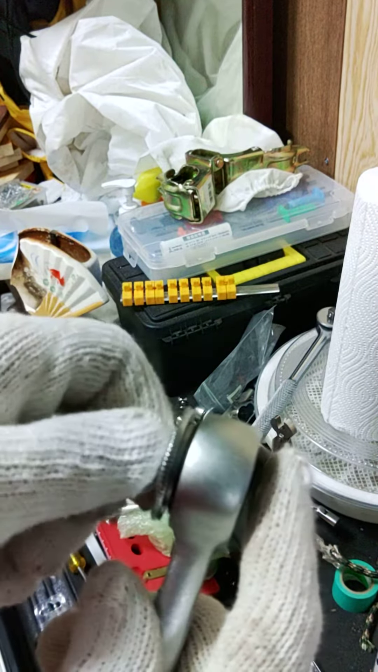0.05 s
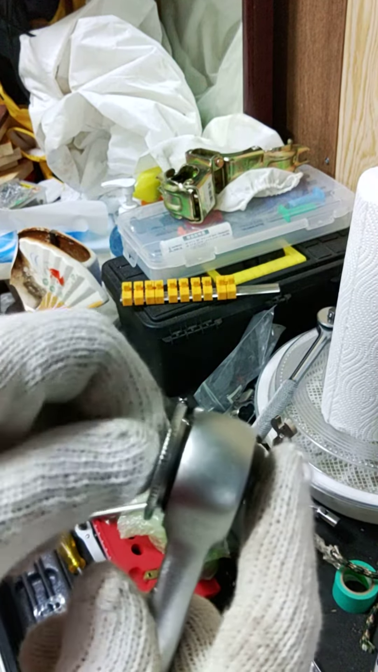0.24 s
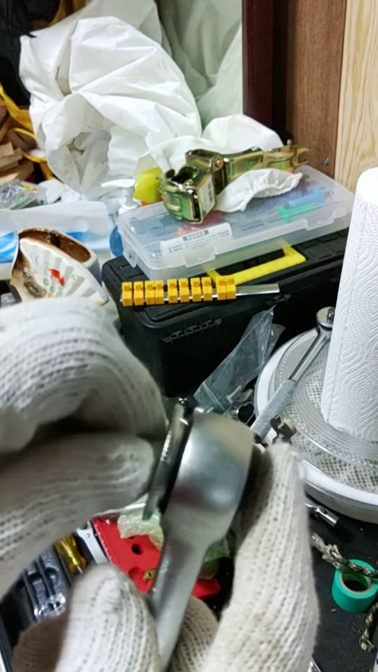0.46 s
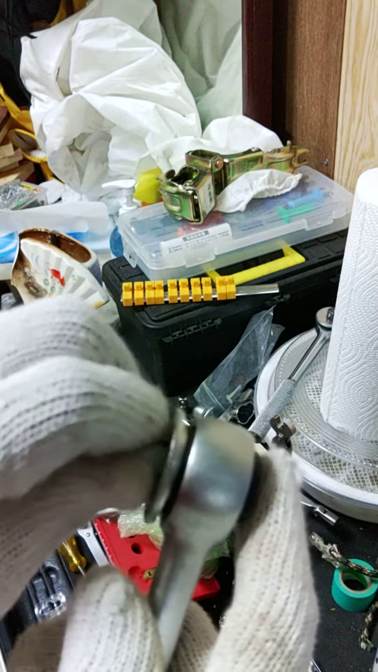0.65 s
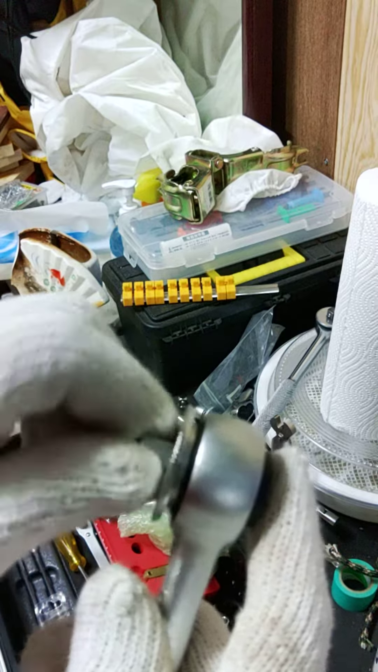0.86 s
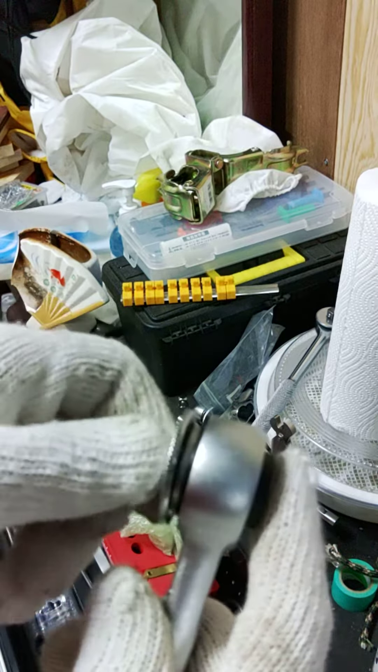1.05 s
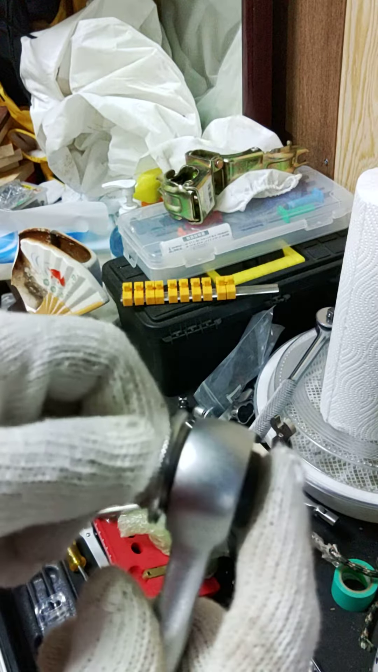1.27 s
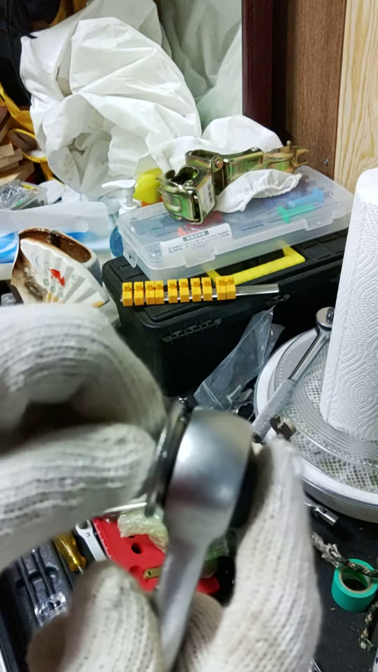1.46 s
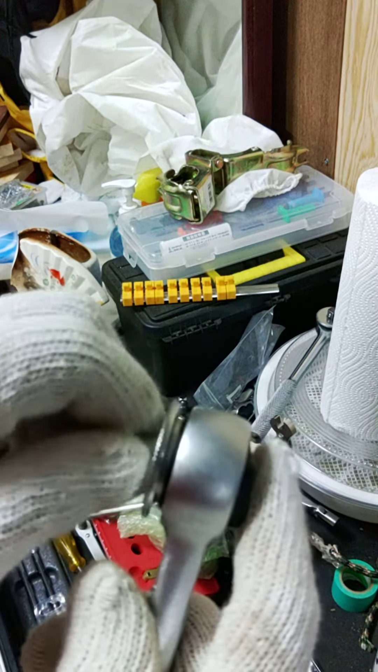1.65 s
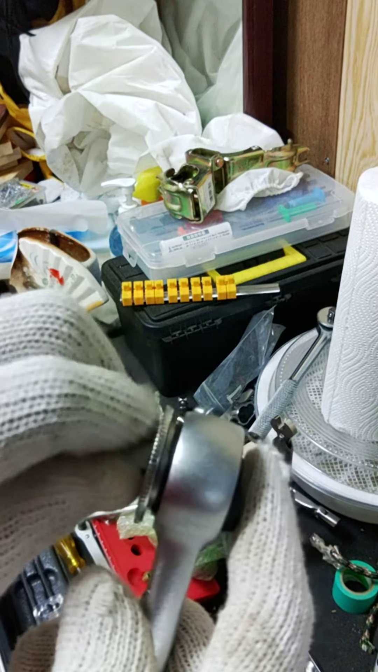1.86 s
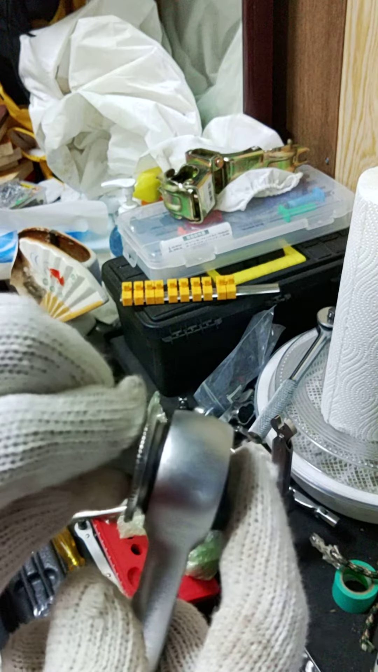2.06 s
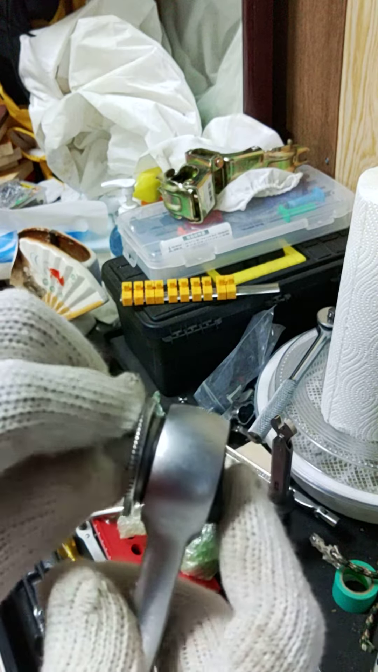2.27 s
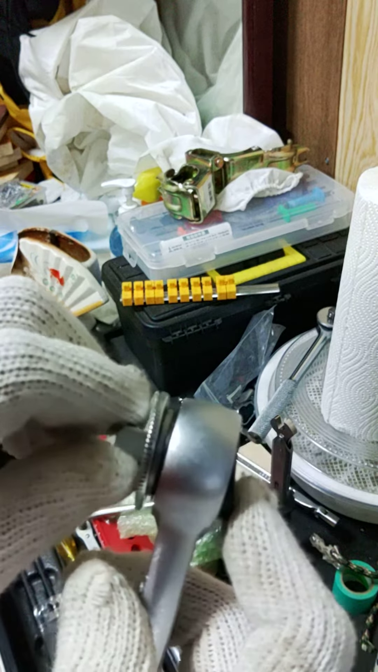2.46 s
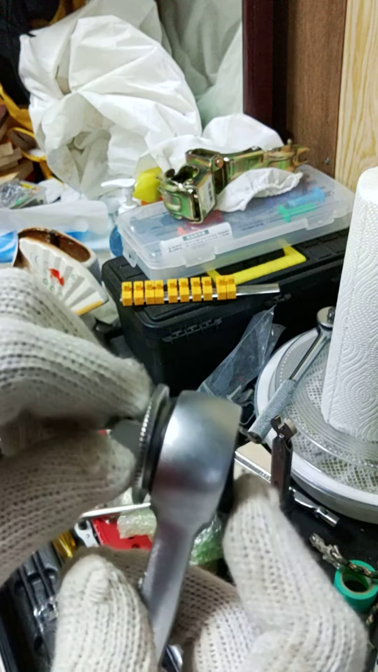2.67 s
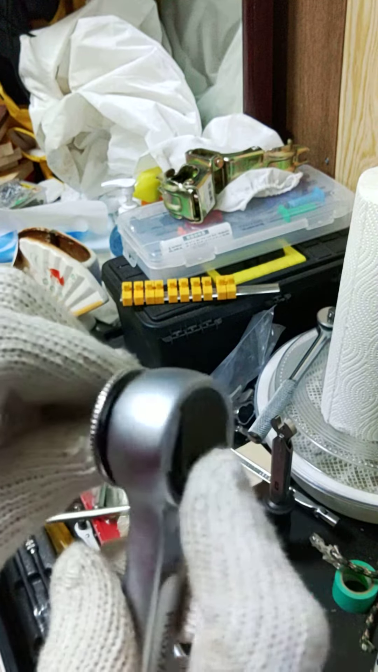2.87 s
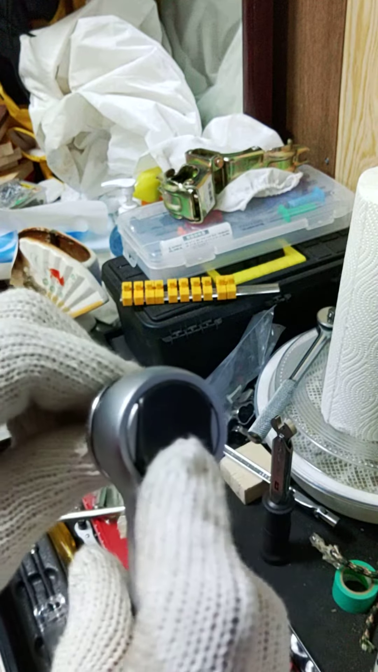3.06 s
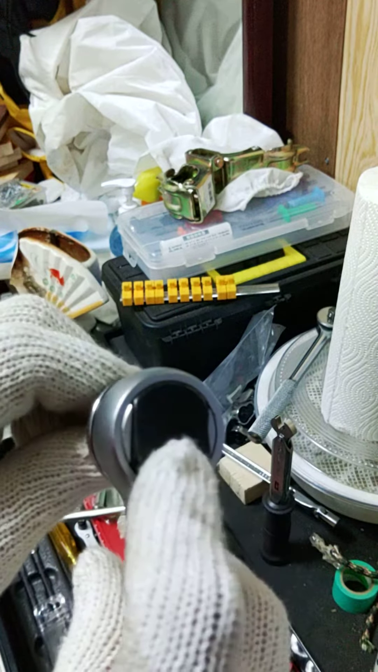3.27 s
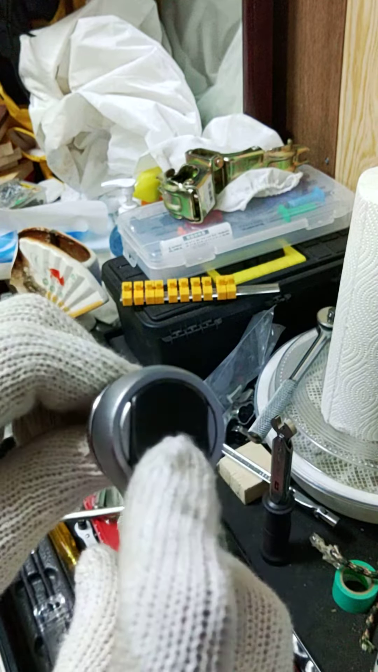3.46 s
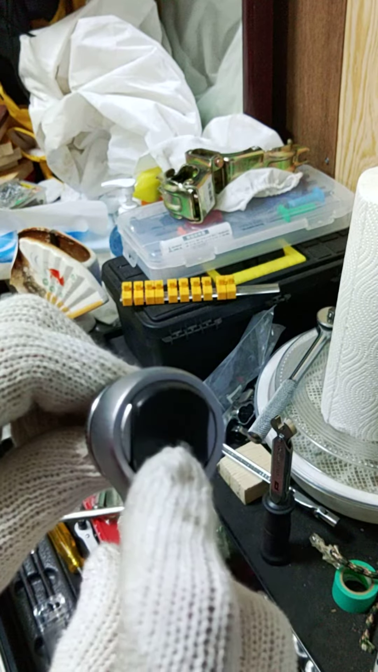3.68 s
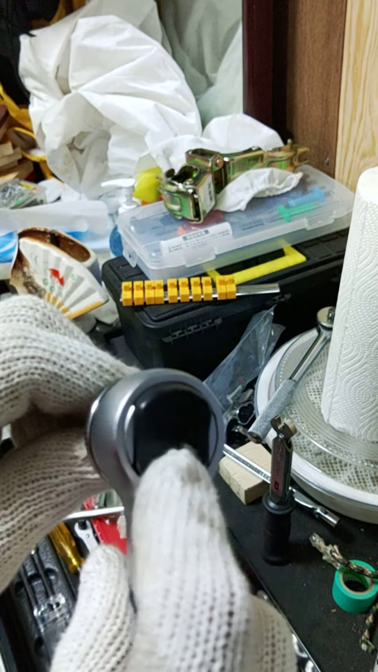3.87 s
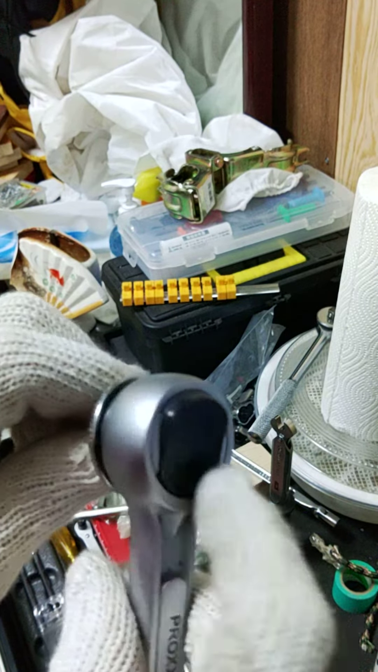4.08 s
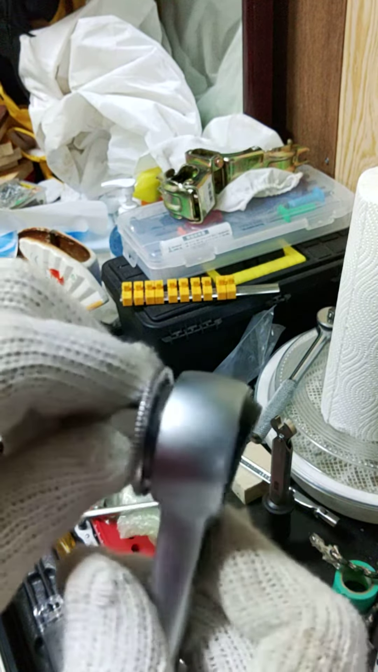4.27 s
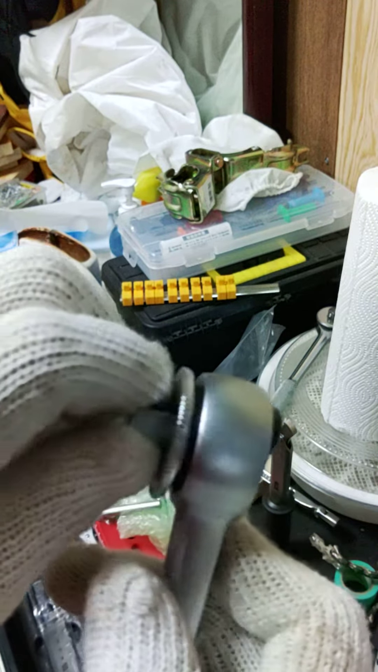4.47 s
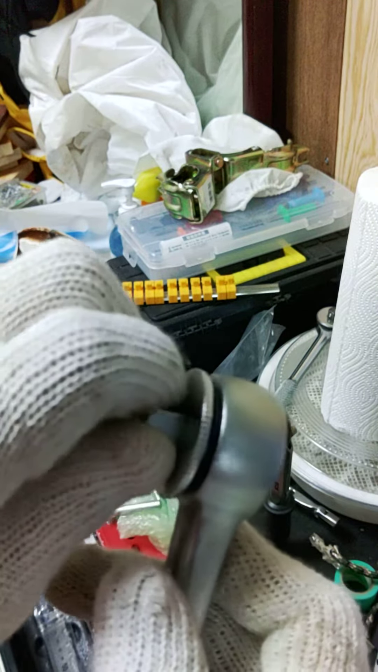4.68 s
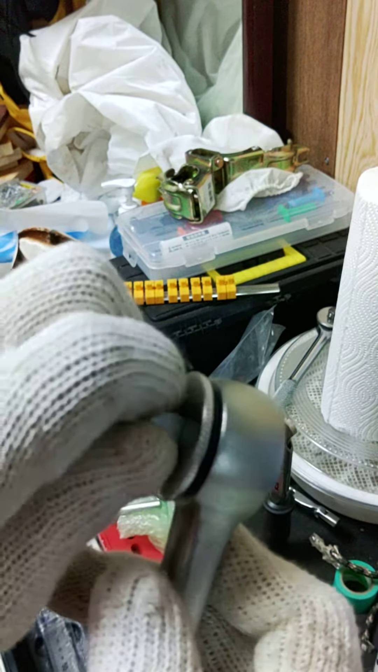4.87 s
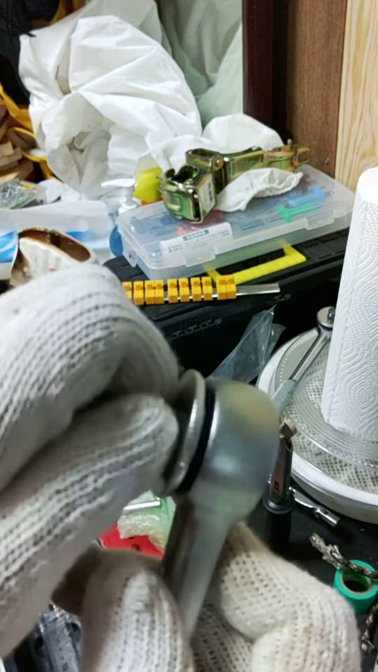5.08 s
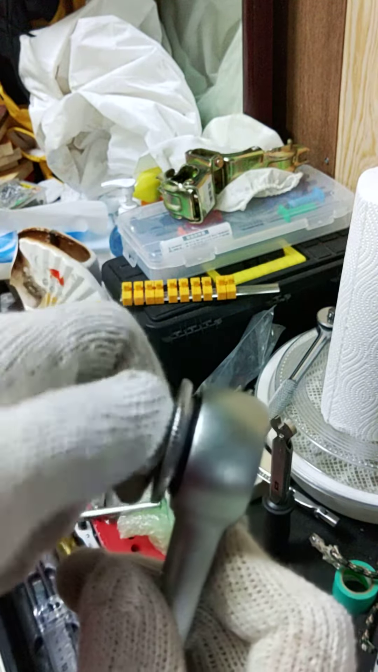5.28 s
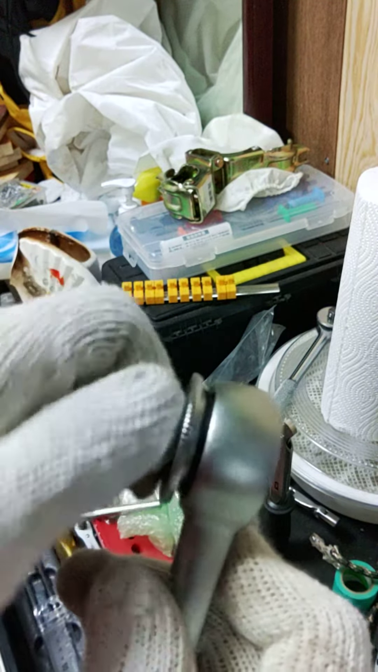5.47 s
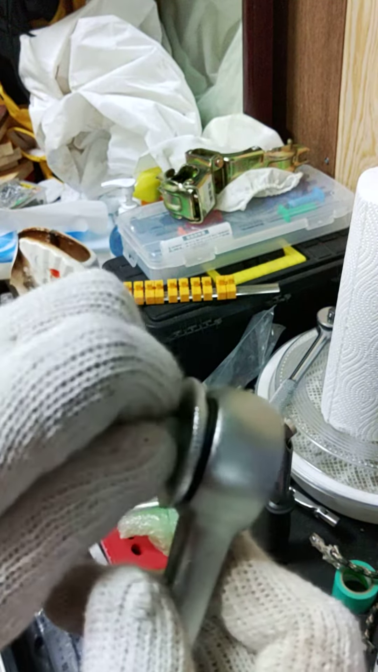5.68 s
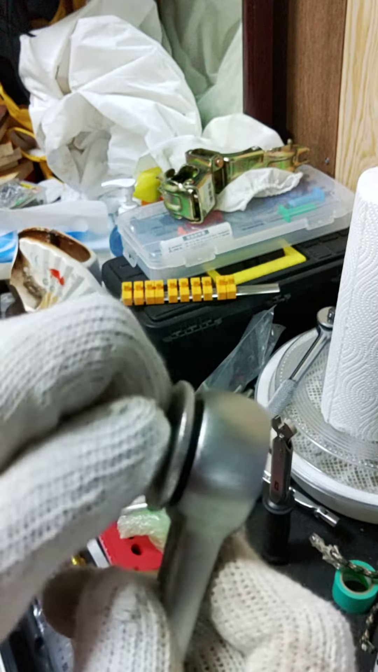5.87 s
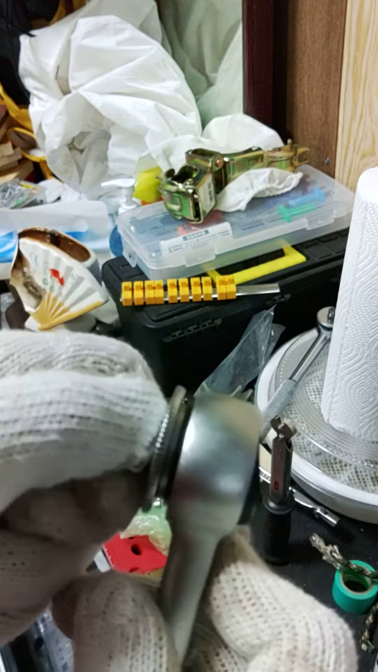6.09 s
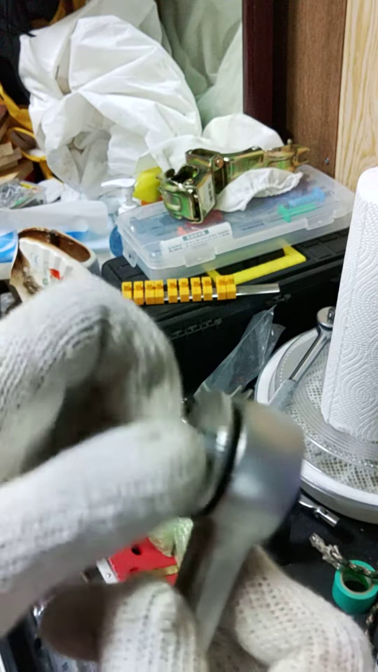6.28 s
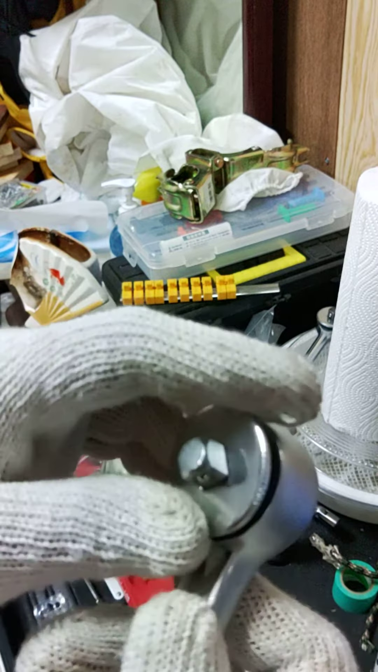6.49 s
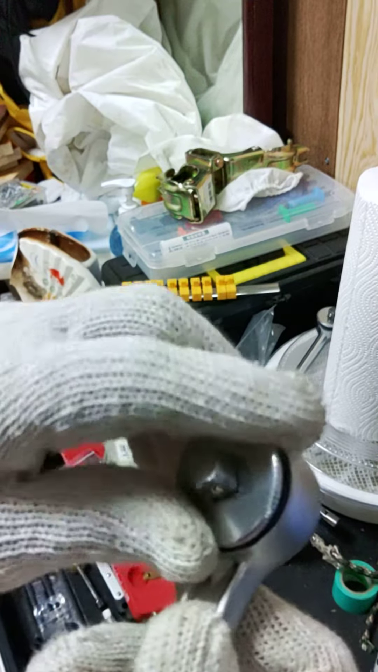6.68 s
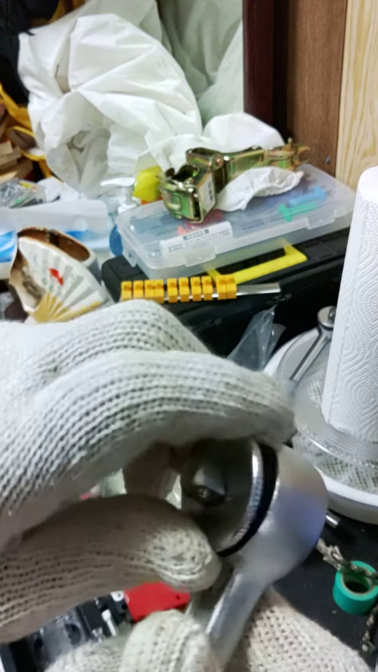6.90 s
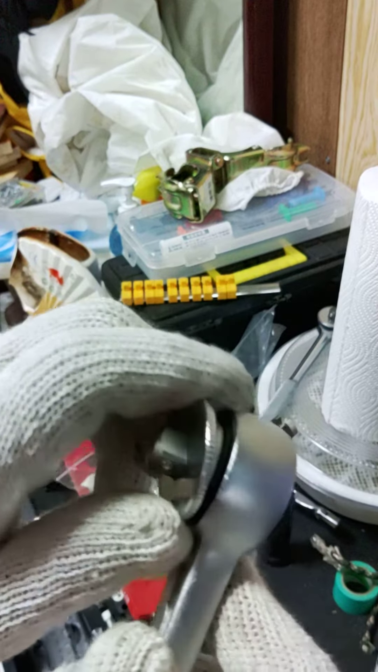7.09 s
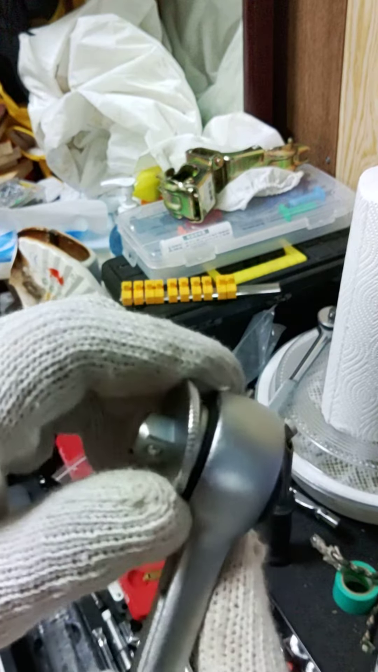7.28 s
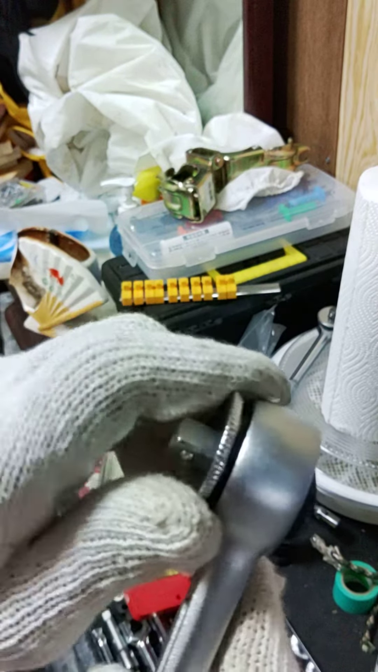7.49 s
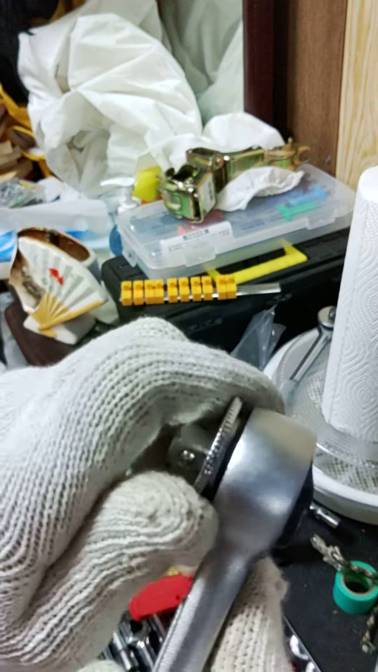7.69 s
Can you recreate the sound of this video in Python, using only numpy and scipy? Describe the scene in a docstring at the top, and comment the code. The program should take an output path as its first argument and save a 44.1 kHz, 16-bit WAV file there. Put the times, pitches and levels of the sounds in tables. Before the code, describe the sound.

A steel ratchet wrench clicks close by in four quick runs, with a ringing lever snap and faint glove rubbing over low rumble.

```python
"""Over a low rumble and faint hiss, a steel ratchet wrench clicks close to a phone in a small workshop.
Its pawl drops off tooth after tooth in four runs, then a few stray clicks. Gloves rub and bump the steel;
between runs the reversing lever snaps over and the loose drive clinks, setting the wrench ringing.
Bench and walls answer each click. Far outside a car swells and passes, and late on the turning hands
stir the air at the phone."""
import sys
import numpy as np
from scipy import signal
from scipy.fft import rfft, irfft
from scipy.io import wavfile
from scipy.ndimage import uniform_filter1d

SR = 44100
rng = np.random.default_rng(int(sys.argv[2]) if len(sys.argv) > 2 else 0)


def to_wav(s):
    """Save 16-bit WAV."""
    ch = np.atleast_2d(s).T  # columns
    pcm = np.round(np.clip(ch, -1, 1) * 32767)  # PCM
    wavfile.write(sys.argv[1], SR, pcm.astype(np.int16))


N = 341334
TIME = np.arange(N) / SR
BODY_HZ = np.fft.rfftfreq(2048, 1 / SR)

# The bed: building rumble and microphone hiss. Each row: frequency in Hz, gain in dB.
RUMBLE_EQ = [(8, 7), (25, -0.5), (42, -7.5), (60, -14), (90, -21), (150, -20), (200, -31.5), (500, -51.5)]
HISS_EQ = [(100, 21), (2000, 0.5), (5000, 1), (11000, -3.5), (13000, -4), (15000, 6), (16500, 13)]
# One pawl drop per tooth. Each row: start in seconds, level in dB.
PAWL_DROPS = [(0.1908, -24.0), (0.2651, -24.0), (0.3083, -23.5), (0.3704, -24.0), (0.417, -23.5),
              (0.493, -24), (0.567, -25), (0.606, -25), (0.6575, -26.5), (0.6957, -27), (0.7401, -28),
              (1.3525, -27.5), (1.3851, -28), (1.4802, -28.5), (1.5193, -30), (1.605, -28), (1.686, -28.5),
              (1.7633, -26.5), (1.8231, -26.5), (1.9032, -25.5), (1.956, -27), (2.0165, -25.5),
              (2.1022, -26.5), (4.8542, -23.5), (4.909, -23.5), (4.9591, -24.0), (5, -24.0),
              (5.0418, -23.0), (5.1058, -22.5), (5.1569, -21.5), (5.2146, -23), (5.2443, -23),
              (5.2776, -23.5), (5.3111, -23), (5.334, -22.5), (5.3512, -23), (5.3722, -24.5),
              (5.8109, -22.0), (5.8474, -22.5), (5.9056, -20.5), (5.9274, -22.0), (5.95, -21.0),
              (5.972, -22.5), (5.9959, -22), (6.0192, -22.5), (6.0442, -23.5), (6.0727, -23.5),
              (6.123, -22.5), (6.684, -46.5), (7.624, -22.5), (7.7255, -22.5)]
# The pawl keeps its seat and colour until the hands shift. Each row: start in seconds, seat resonance
# in Hz, its height in dB, lift of the body below about 6 kHz in dB, height of the pawl resonance in dB.
HAND_GRIPS = [(0, 6630, 1.6, -1.3, 3.3), (.23, 8310, 8.5, 0.7, 8), (.53, 8730, 4, 1, 1),
              (1.2, 6770, -3.5, 4.5, 9), (1.5, 6550, 4, 4, 12.5), (1.72, 6640, 3, -0.5, 5.5),
              (4.7, 8340, 6.5, 0, 5.5), (5.02, 8480, 5.4, -1, 13), (5.23, 8700, -7.5, 1, 7.5),
              (5.7, 7050, 2.5, 0.8, 9.5), (6.01, 7600, -5.5, -2.8, .2), (6.6, 7140, 22, 19, 4),
              (7.5, 8100, -5, -2.5, 9)]
# The head's small steel parts under a sharp tap. Each row: frequency in Hz, gain in dB.
HEAD_EQ = [(300, -39), (900, -35), (1200, -25), (1550, -18.5), (2000, -25.5), (2550, -14.5), (3100, -7.5),
           (3650, -12), (5700, -14), (6700, -7.5), (9100, -4.5), (10300, -.5), (11400, -2.5), (13400, 0.5),
           (14600, 6.5), (16000, -4)]
# The ring of the whole wrench. Each row: pitch in Hz, level in dB, time to fall 60 dB in seconds.
WRENCH_MODES = [(3040, -32.5, 0.04), (3950, -34, 0.24), (6460, -16.5, 0.3), (6560, -12, 0.12),
                (12020, 8.5, 0.12), (11900, -15, .09)]
# Slaps off bench, boxes and cupboard. Each row: delay in seconds, level in dB.
NEAR_ECHOES = [(.0031, -13.5), (.0048, -12), (.0079, -14), (0.011, -19.5), (0.0176, -24)]
# The room's tail. Each row: frequency in Hz, time to fall 60 dB in seconds.
ROOM_DECAY = [(500, 0.28), (3000, 0.21), (8000, 0.22), (16000, 0.17)]
# Glove strokes on the steel. Each row: firmest moment in seconds, length in seconds, level in dB.
GLOVE_STROKES = [(1.0, 0.61, -65.5), (2.2, 0.7, -73), (3.0, 0.38, -63.5), (4.13, 0.18, -63.5),
                 (4.35, 0.42, -69), (5.53, 0.18, -63), (6.3, .25, -67), (6.85, 0.41, -71),
                 (7.28, 0.5, -60.5), (7.47, 0.19, -49.5), (7.68, 0.52, -60)]
# A light brush, a firm slide and a finger's bump. Each row: frequency in Hz, gain in dB.
BRUSH_EQ = [(500, -15), (2500, -6), (5000, -8.5), (9000, -11), (11000, -8), (14000, 1), (16000, -0.5)]
SLIDE_EQ = [(500, -16.5), (2500, -14.5), (5200, -4), (7000, 4.5), (9200, 6.5), (11500, -9), (13500, 4),
            (16000, -4)]
BUMP_EQ = [(100, -19), (260, 11), (550, -2), (1500, -22), (2500, -3), (4000, -14.5), (15000, -31)]
# Fingers bumping the tool. Each row: start in seconds, level in dB, tilt in dB per octave.
FINGER_BUMPS = [(1.08, -62.5, 3), (2.775, -62, 11), (4.492, -61, 10.5), (7.443, -48.5, -1)]
# Lever snap and drive clinks. Each row: start in seconds, crack in dB, ring in dB,
# tilt of the ring in dB per octave.
LEVER_AND_DRIVE_HITS = [(2.981, -60, -51.5, -16), (3.6953, -18, -30, 7), (3.6999, -38, -19.5, 3.5),
                        (6.373, -47, -43, -6), (6.386, -65, -42, -15), (6.418, -51, -34, 0),
                        (6.427, -37.5, -26, 0), (6.432, -49, -28, 1)]
# The crack of lever and drive on their stops. Each row: frequency in Hz, gain in dB.
STOP_EQ = [(300, -25), (800, -38), (1000, -7), (1250, -18.5), (2300, -24), (3050, 9.5), (3550, -3),
           (6000, -0.5), (8700, 5), (10000, -1), (12000, 10.5), (12800, 10), (14800, 8.5), (16000, -11.5)]
# The car's drone, its tyre whine and the stirred air. Each row: frequency in Hz, gain in dB.
CAR_EQ = [(30, 1), (70, 7.5), (110, 5), (190, -3), (290, 4), (400, -2), (600, -5.5), (950, -7.5),
          (1400, -9.5), (2200, -17), (4000, -31.5), (9000, -46)]
TYRE_EQ = [(500, -26), (760, -5), (890, 0), (1060, -1.5), (1300, -15.5), (2500, -28)]
DRAUGHT_EQ = [(8, 5), (25, -0.5), (45, -15), (90, -26), (300, -55.5)]
# Puffs of air at the phone. Each row: peak in seconds, length in seconds, level in dB.
AIR_PUFFS = [(6.17, 0.52, -37.5), (6.85, 1.4, -45)]


def undb(db):
    """Decibels to gain."""
    return 10 ** (np.asarray(db) / 20)


def over_hz(points, hz):
    """Read a curve of (Hz, value) points on a log-frequency axis."""
    point_hz, value = np.transpose(points)
    return np.interp(np.log(hz + 1), np.log(point_hz), value)


def colour(x, eq):
    """EQ a long sound and set its rms to 1."""
    hz = np.fft.rfftfreq(len(x), 1 / SR)
    shaped = irfft(rfft(x) * undb(over_hz(eq, hz)), len(x))
    return shaped / np.sqrt(np.mean(shaped ** 2))


def wander(rate_hz):
    """A smooth random drift with a spread near 1."""
    hold = int(SR / rate_hz)
    steps = np.repeat(rng.standard_normal(N // hold + 1), hold)
    return 0.93 * uniform_filter1d(uniform_filter1d(steps, hold), hold)[:N]


def swells(moves, rise_share, rest_db):
    """A fader ride: each move swells and fades above a resting level."""
    power = undb(rest_db) ** 2
    for peak_s, length_s, db in moves:
        width_s = length_s * np.where(TIME < peak_s, rise_share, 1 - rise_share)
        power = power + undb(db) ** 2 * np.exp(-2 * ((TIME - peak_s) / width_s) ** 2)
    return np.sqrt(power)


def at_level(hit, db):
    """Set the rms of a hit's first 8 ms."""
    return hit * undb(db) / np.sqrt(np.mean(hit[:int(.008 * SR)] ** 2))


def add(out, start_s, sound):
    """Drop a sound onto a track."""
    start = int(start_s * SR)
    out[start:start + len(sound)] += sound[:N - start]


def building_rumble(level_db=-50.5, wander_db=2.0):
    """The building's low rumble, gently wavering."""
    return colour(rng.standard_normal(N), RUMBLE_EQ) * undb(level_db + wander_db * wander(12))


def microphone_hiss(level_db=-77):
    """The microphone's own steady noise."""
    return colour(rng.standard_normal(N), HISS_EQ) * undb(level_db)


def chatter(rise_s, hold_s, fall_s):
    """Two surfaces meet in a dense flurry of tiny contacts that holds a moment and dies."""
    t = TIME[:1024]
    attack = 1 - np.exp(-t / rise_s)
    release = 1 / (1 + np.exp(np.minimum((t - hold_s) / fall_s, 50)))
    return rng.standard_normal(len(t)) * attack * release


def resonate(flurry, body_db):
    """A flurry of contacts excites a body whose gain at each of BODY_HZ is body_db."""
    size = 2 * (len(body_db) - 1)
    push = rfft(flurry, size)
    # hard contacts spread their energy evenly; only the fine detail differs from blow to blow
    power = uniform_filter1d(np.abs(push) ** 2, size=56, mode="mirror")
    cepstrum = irfft(np.log(undb(body_db) / np.sqrt(power)))
    # minimum phase: the body sounds only after the blow
    cepstrum[1:size // 2] *= 2
    cepstrum[size // 2 + 1:] = 0
    return irfft(push * np.exp(rfft(cepstrum)))


def wrench_ring(tilt_db):
    """The wrench rings; where it is struck and held decides how its modes share the blow."""
    t = TIME[:SR // 2]
    out = 0
    for hz, db, t60 in WRENCH_MODES:
        stray_db, stray_hz = rng.standard_normal(2) * (1.5, 8)
        envelope = undb(db + stray_db + tilt_db * np.log2(hz)) * np.exp(-np.log(1000) * t / t60)
        out = out + envelope * np.sin(2 * np.pi * (hz + stray_hz) * t)
    return out


def pawl_clicks(crack_db=0.25, ring_db=-27.5, scrape_db=-27, scrape_lead_s=0.0047, pawl_hz=12600):
    """The pawl scrapes up a tooth, falls off and chatters into its seat; the grip colours the click."""
    out = np.zeros(N)
    body_band = over_hz([(5800, 1), (6800, 0)], BODY_HZ)
    scrape_eq = over_hz(HEAD_EQ, BODY_HZ) + 8 * body_band
    for start_s, db in PAWL_DROPS:
        grip = sum(row[0] <= start_s for row in HAND_GRIPS[1:])
        _, seat_hz, seat_db, body_db, pawl_db = HAND_GRIPS[grip]
        # from tooth to tooth the pawl lands a little differently
        seat_hz = seat_hz + 35 * rng.standard_normal()
        stretch = 1 + .05 * rng.standard_normal() * body_band
        crack_eq = over_hz(HEAD_EQ, BODY_HZ * stretch) + body_band * body_db
        for hz, width_hz, peak_db in (seat_hz, 300, seat_db), (pawl_hz, 210, pawl_db):
            peak_db = peak_db - rng.standard_normal()
            bell = np.exp(-.5 * ((BODY_HZ - hz) / width_hz) ** 2)
            crack_eq = crack_eq + (peak_db - crack_eq) * bell
        contact = chatter(rise_s=.0003, hold_s=.002 * np.exp(.15 * rng.standard_normal()), fall_s=.0009)
        # the fist round the head deadens the highest modes
        click = at_level(wrench_ring(tilt_db=-17), db + ring_db)
        add(click, 0, at_level(resonate(contact, crack_eq), db + crack_db))
        add(out, start_s, workshop(click))
        # sliding over the tip of the tooth is softer and duller than the drop
        scrape = resonate(chatter(rise_s=.002, hold_s=scrape_lead_s, fall_s=0.00041), scrape_eq)
        add(out, start_s - scrape_lead_s, at_level(scrape, db + scrape_db + 3 * rng.standard_normal()))
    return out


def workshop(sound, tail_db=-12.0, build_s=0.0097):
    """Near surfaces slap a sound back, then the cluttered room dies away."""
    t = TIME[:SR // 3]
    hz = np.fft.rfftfreq(len(t), 1 / SR)
    noise = rfft(rng.standard_normal(len(t)))
    bands_hz, t60s = np.transpose(ROOM_DECAY)
    tail = 0
    for t60, solo in zip(t60s, np.eye(len(bands_hz))):
        band = over_hz(np.column_stack([bands_hz, solo]), hz)
        tail = tail + irfft(noise * band, len(t)) * np.exp(-np.log(1000) * t / t60)
    tail = tail * (1 - np.exp(-(t / build_s) ** 2))
    response = tail * undb(tail_db) / np.sqrt(np.sum(tail ** 2))
    response[0] += 1  # the direct sound
    for delay_s, db in NEAR_ECHOES:
        shift_s = .00015 * rng.standard_normal()  # the hands move, so no path is twice the same
        response[int((delay_s + shift_s) * SR)] += undb(db)
    return signal.fftconvolve(sound, response)


def glove_rub(grain_db=2.0, flutter_db=2.0, firm_db=-46):
    """Knitted fibres catch and slip on the steel; a firm slide sits lower in pitch than a light brush."""
    fibres = rng.standard_normal(N) * undb(grain_db * rng.exponential(size=N).clip(0, 6))
    pressure = swells(GLOVE_STROKES, rise_share=0.43, rest_db=-72)
    firmness = np.clip(pressure / undb(firm_db), 0, 1)
    rub = (1 - firmness) * colour(fibres, BRUSH_EQ) + firmness * colour(fibres, SLIDE_EQ)
    return rub * pressure * undb(flutter_db * wander(120))


def finger_bumps():
    """Gloved fingers knock softly on the tool."""
    out = np.zeros(N)
    for start_s, db, tilt_db in FINGER_BUMPS:
        bump_eq = over_hz(BUMP_EQ, BODY_HZ) + tilt_db * np.log2(BODY_HZ + 50)
        contact = chatter(rise_s=0.00043, hold_s=0.0018, fall_s=0.001)
        add(out, start_s, at_level(resonate(contact, bump_eq), db))
    return out


def lever_and_drive():
    """Lever and drive crack against their stops and set the whole wrench ringing."""
    out = np.zeros(N)
    for start_s, crack_db, ring_db, tilt_db in LEVER_AND_DRIVE_HITS:
        ring = wrench_ring(tilt_db)
        # while the parts still touch, the ring loses most of its energy at once
        choke = 0.45 + np.exp(-TIME[:len(ring)] / 0.016)
        clink = at_level(ring * choke, ring_db)
        contact = chatter(rise_s=0.0014, hold_s=0.0027, fall_s=0.00021)
        add(clink, 0, at_level(resonate(contact, over_hz(STOP_EQ, BODY_HZ)), crack_db))
        add(out, start_s, workshop(clink))
    return out


def passing_car(nearest_s=6.55, speed_m_s=12.6, distance_m=17.8, nearest_db=-59, tyres_db=-6.0):
    """A far car swells and fades along a straight road; its tyre whine stands out only when nearest."""
    nearness = distance_m / np.hypot(distance_m, speed_m_s * (TIME - nearest_s))
    tyres = colour(rng.standard_normal(N), TYRE_EQ) * undb(tyres_db) * nearness
    gain = nearness * undb(nearest_db + wander(8.3))
    drone = colour(rng.standard_normal(N), CAR_EQ)
    return gain * (drone + tyres)


def hand_draughts():
    """Hands turning the wrench push deep puffs of air at the phone."""
    return colour(rng.standard_normal(N), DRAUGHT_EQ) * swells(AIR_PUFFS, rise_share=.4, rest_db=-60.5)


def scene():
    """The mono mix: wrench and hands up close in the room, over a quiet bed."""
    wrench = pawl_clicks() + lever_and_drive()
    hands = workshop(glove_rub() + finger_bumps())[:N]
    bed = passing_car() + building_rumble() + hand_draughts() + microphone_hiss()
    return (wrench + hands + bed)[None]


def record(dry):
    """The phone cuts the top steeply above 15.7 kHz."""
    return signal.sosfilt(signal.ellip(8, .2, 70, 15700, fs=SR, output="sos"), dry)


dry = scene()
out = record(dry)
to_wav(out)
```